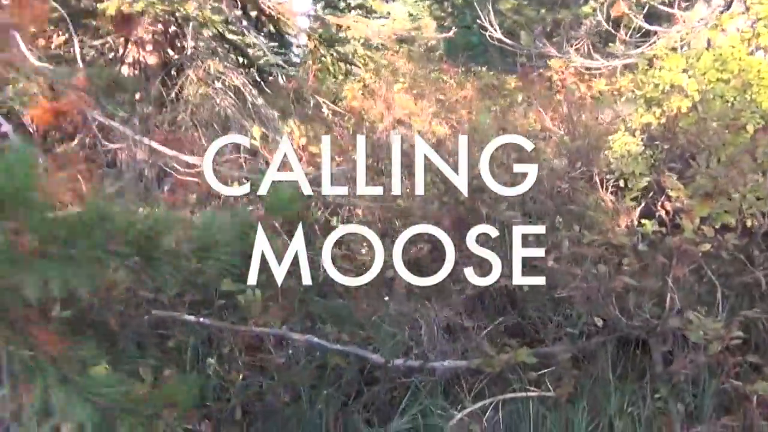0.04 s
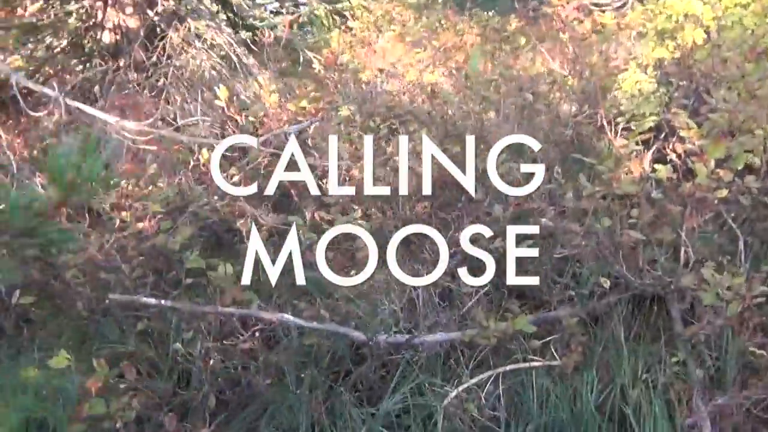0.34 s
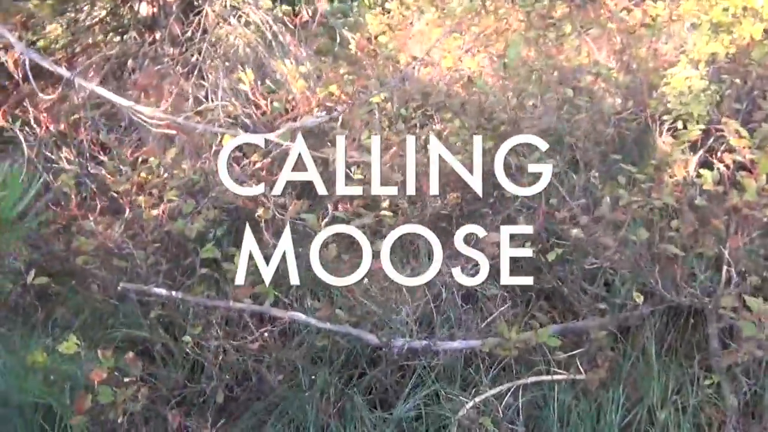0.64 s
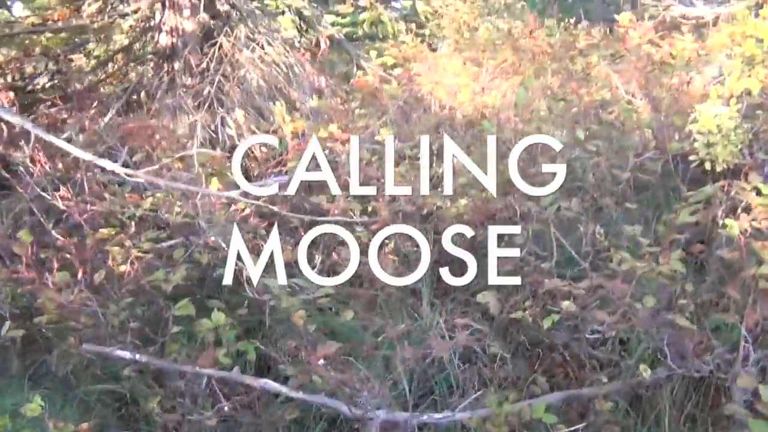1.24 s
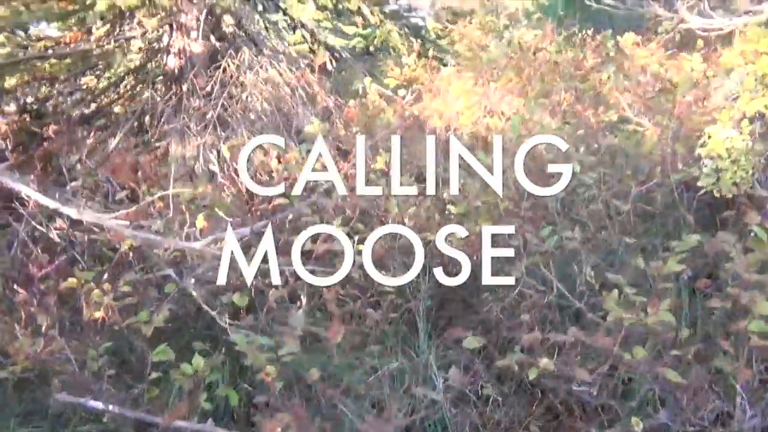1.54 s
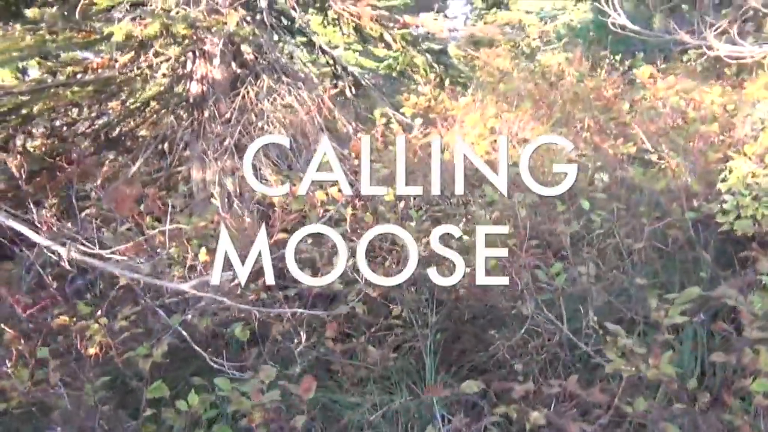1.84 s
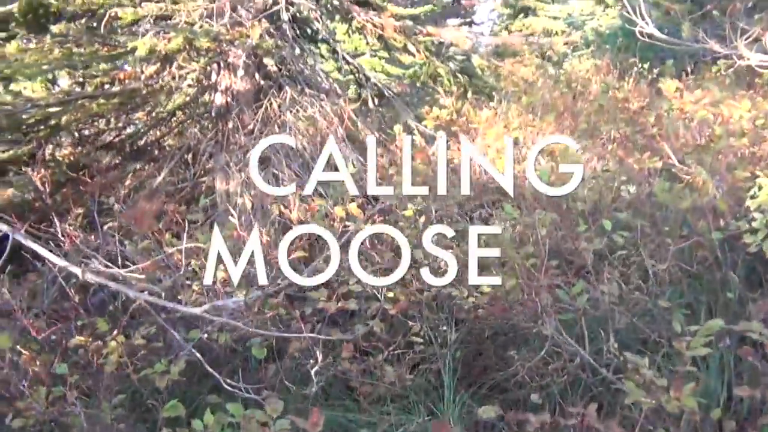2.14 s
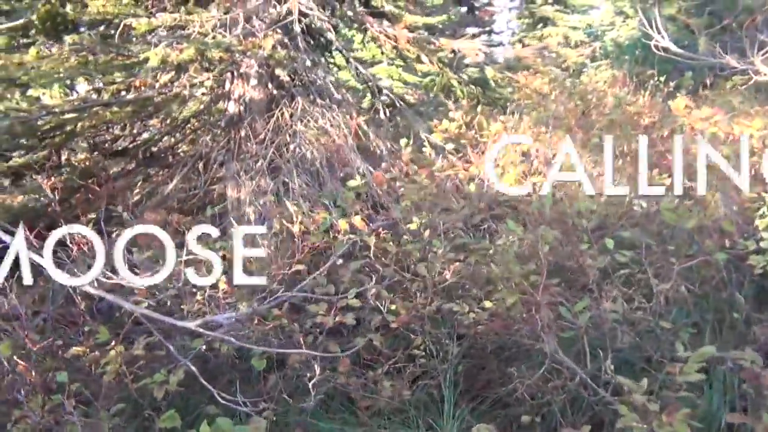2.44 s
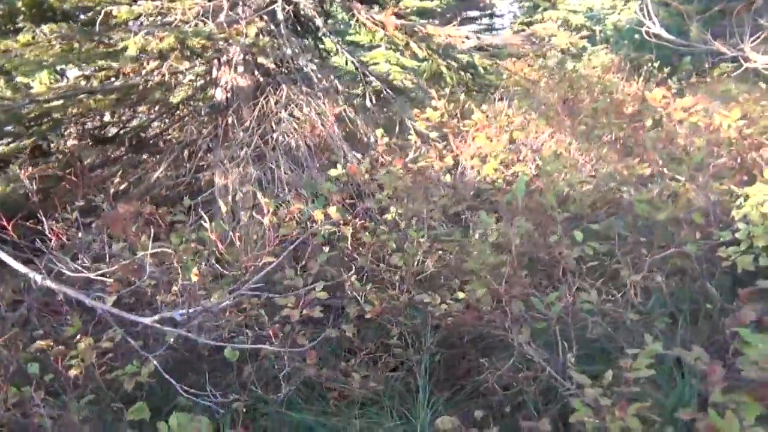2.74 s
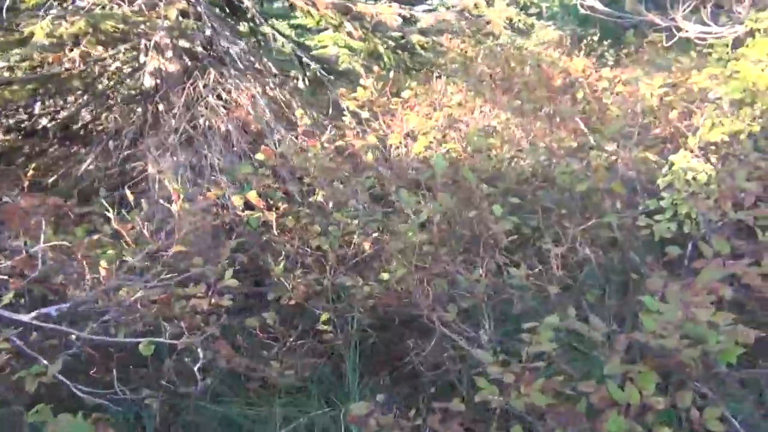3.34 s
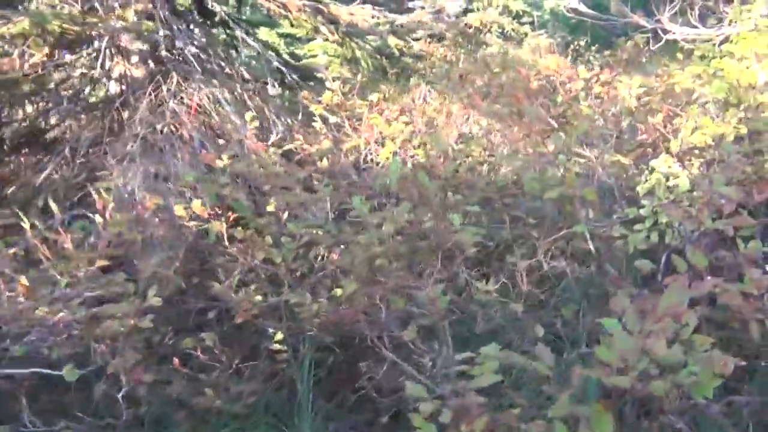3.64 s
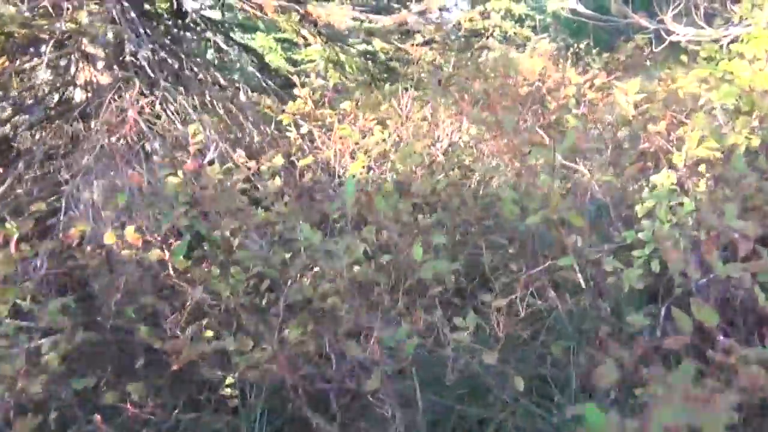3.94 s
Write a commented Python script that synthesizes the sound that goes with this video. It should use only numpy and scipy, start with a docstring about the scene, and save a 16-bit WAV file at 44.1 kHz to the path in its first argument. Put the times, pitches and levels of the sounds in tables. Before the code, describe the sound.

Close rustling of brush and clothing, with microphone handling bumps and a twig snap.

```python
"""A hand-held camera is carried through brush at a forest edge, over faint air and leaf hiss.
Clothing and leaves swish by at once; the grip rubs, scrapes and thumps, with a hard knock at 0.46 s.
A branch sweeps past at 1.1 s. After 1.5 s it is quieter, until a twig snap and a knock at 2.75 s.
A second branch passes at 3.7 s amid ticking twigs. Rubs and knocks travel through the case and
reach the two capsules in opposite polarity, louder on the right."""
import sys
import numpy as np
from scipy import signal
from scipy.fft import rfft, irfft, next_fast_len
from scipy.io import wavfile
from scipy.ndimage import map_coordinates

SR = 44100
rng = np.random.default_rng(int(sys.argv[2]) if len(sys.argv) > 2 else 0)


def unload_wav(signal):
    """Save mono or channel-first audio to the path in sys.argv[1] as 16-bit WAV at rate SR, clipped to [-1, 1]."""
    wavfile.write(
        sys.argv[1],
        SR,
        np.round(np.clip(np.atleast_2d(signal).T, -1, 1) * 32767).astype(np.int16),
    )


N = 176400
T = np.arange(N) / SR

# direction of leaves and twigs: f/Hz, left minus right/dB
FOLIAGE_PAN = [(3000, -17), (8000, 3.5), (12000, -23)]


def amp(db):
    """Decibels to gain."""
    return 10 ** (np.asarray(db) / 20)


def unit(x):
    """Scale to rms 1."""
    return x / np.sqrt(np.mean(x ** 2) + 1e-20)


def along(points, hz):
    """Interpolate (f/Hz, value) points on a log axis."""
    f, v = np.transpose(points)
    return np.interp(np.log(hz + 1), np.log(f + 1), v)


def wobble(rate_hz):
    """Smooth random curve, rate_hz knots a second."""
    return map_coordinates(rng.standard_normal(4096), [T * rate_hz], mode="wrap")


def filtered(x, response):
    """Apply a frequency response."""
    m = next_fast_len(N + SR // 2)
    return irfft(rfft(x, m) * response(np.fft.rfftfreq(m, 1 / SR)), m)[..., :N]


def panned(x, pan):
    """Split the power by pan: f/Hz, left minus right/dB."""
    def gains(hz):
        ratio = amp(along(pan, hz))
        return np.array([ratio, np.ones_like(hz)]) * np.sqrt(2 / (1 + ratio ** 2))
    return filtered(x, gains)


def burst(at_s, rise_s, hold_s, t60_s):
    """Envelope: linear rise, hold, exponential fall."""
    return np.clip((T - at_s) / rise_s, 0, 1) * amp(-60 * np.maximum(T - at_s - rise_s - hold_s, 0) / t60_s)


def pass_gain(db, at_s, hold_s, swell_s, t60_s):
    """Something slides past: swell by 60 dB up to at_s, hold, fade."""
    return amp(db - 60 * np.maximum((at_s - T) / swell_s, 0) - 60 * np.maximum((T - at_s - hold_s) / t60_s, 0))


def flutter(rate_hz):
    """Uneven contact: the gain wanders by about 1 dB."""
    return amp(1.2 * wobble(rate_hz))


def crinkle(per_s=66, surge_db=4.5, t60_s=0.0085):
    """Single leaves catch and let go: brief surges on a gain of 1."""
    catches = (rng.random(N) < per_s / SR) * rng.random(N)
    return 1 + amp(surge_db) * signal.fftconvolve(catches, amp(-60 * T / t60_s))[:N]


def friction(colour, pan, correlation, grain_db, slips_per_s=830):
    """Stereo noise with tiny slips, rms 1. correlation: f/Hz, value (-1 = opposite polarity)."""
    slips = (rng.random((2, N)) < slips_per_s / SR) * rng.choice([-1, 1], (2, N))
    pair = rng.standard_normal((2, N)) + amp(grain_db) * unit(slips)

    def mid_side_gains(hz):
        angle = np.arccos(np.clip(along(correlation, hz), -1, 1)) / 2
        return amp(along(colour, hz)) * [np.cos(angle), np.sin(angle)]
    mid, side = filtered(pair, mid_side_gains)
    return unit(panned(np.array([mid + side, mid - side]), pan))


def background(air_db=-53.5, hiss_db=-54):
    """Faint air in the trees, thin hiss of stirring leaves."""
    # spectra: f/Hz, level/dB
    air_colour = [(100, -5.5), (250, 0.5), (670, -2.5), (850, 2), (1080, -5), (5000, -12.5), (12000, -14)]
    hiss_colour = [(2000, -26), (9000, -17), (16000, -20)]
    air = friction(air_colour, [(1, -9)], [(200, 0.3), (500, -0.35)], grain_db=-30)
    hiss = friction(hiss_colour, FOLIAGE_PAN, [(1, 0.41)], grain_db=-35)
    return amp(air_db) * air + amp(hiss_db) * flutter(16) * crinkle() * hiss


def twigs():
    """Scuffs and snaps mostly on the right, dry ticks and ringing stems ahead."""
    # leaves and twigs flicking past: t/s, level/dB, hold/s, t60/s
    scuffs = [(0.745, -29.5, 0.014, 0.2), (1.168, -33, 0.0053, 0.051), (1.359, -43.5, 0.055, 0.069),
              (1.52, -40.5, 0.0044, 0.092), (2.753, -33.5, 0.0025, 0.083), (3.784, -42, 0.172, 0.04)]
    # twigs: t/s, level/dB, t60/s
    snaps = [(1.405, -40, 0.014), (1.5185, -29.5, 0.0068), (1.65, -36, 0.02), (1.933, -40, 0.015),
             (2.7527, -19, 0.0028)]
    ticks = [(.3615, -34.5, 0.038), (0.5225, -28, 0.1), (1.843, -37, .01), (3.44, -32, 0.0097),
             (3.7188, -34, 0.0024), (3.799, -21, 0.0051), (3.892, -28.5, .008), (3.951, -33, 0.023)]
    # thin stems: t/s, level/dB, f/Hz
    pings = [(2.061, -44, 6360)]
    # spectra: f/Hz, level/dB
    scuff_colour = [(700, -17), (4500, -5.5), (8000, 0), (12000, 5), (16000, -6)]
    tick_colour = [(600, -22), (4500, -6), (9500, 0), (16000, -3)]
    scuff_gain = sum(amp(db) * burst(s, 0.004, hold, t60) for s, db, hold, t60 in scuffs)
    snap_gain = sum(amp(db) * burst(s, 0.0004, 0, t60) for s, db, t60 in snaps)
    tick_gain = sum(amp(db) * burst(s, 0.0004, 0, t60) for s, db, t60 in ticks)
    stems = sum(amp(db) * burst(s, 0.0032, 0, 0.11) * np.sin(2 * np.pi * hz * T + 2 * wobble(990))
                for s, db, hz in pings)
    right = friction(scuff_colour, FOLIAGE_PAN, [(3000, -0.3), (8000, 0.3)], grain_db=-9)
    ahead = friction(tick_colour, [(1, -2)], [(1, 0)], grain_db=-9)
    return (scuff_gain * flutter(140) + snap_gain) * right + tick_gain * ahead + stems


def thumps(rub_gain, sway_hz=58.4, rough_db=-5.5, rumble_db=-4, floor_db=-57):
    """Steps and grip jolt the whole camera, over a low rumble that follows the rubbing."""
    # jolts: t/s, level/dB, f/Hz, t60/s, deep sway re tone/dB
    hits = [(0.362, -23, 200, 0.038, -25), (0.449, -27.5, 178, 0.24, -10), (0.502, -33, 130.5, 0.27, -20),
            (.915, -35.5, 168, 0.29, -27), (.964, -24.5, 195.2, 0.31, -31), (1.18, -29.5, 121.4, 0.15, -2),
            (1.451, -28.5, 115.6, 0.2, -0.5), (1.515, -42.5, 99, 0.38, 7), (2.757, -40, 120.6, 0.3, 7),
            (2.973, -45.5, 127, 0.18, 10), (3.707, -33.5, 114, 0.1, 4)]
    # body rumble: f/Hz, level/dB
    colour = [(25, -1), (58, 4), (125, -2.5), (200, 0.5), (280, -14.5), (700, -44.5)]
    # f/Hz, left minus right/dB
    pan = [(60, -1), (120, -3), (220, -4.5)]
    rough = unit(filtered(rng.standard_normal(N), lambda hz: amp(along(colour, hz))))
    jolts = np.zeros(N)
    for s, db, hz, t60, sway_db in hits:
        phase = 2 * np.pi * hz * (T - s) + 0.89 * wobble(60)
        body = np.sin(phase) + amp(sway_db) * np.sin(sway_hz / hz * phase) + amp(rough_db) * rough
        jolts += amp(db) * burst(s, 0.017 * t60, 0, t60) * body
    rumble = friction(colour, pan, [(200, 0.95), (320, 0.1)], grain_db=-12.5)
    rumble_gain = np.hypot(amp(rumble_db) * rub_gain, amp(floor_db)) * flutter(14)
    return panned(jolts, pan) + rumble_gain * rumble


def grip(rub_gain):
    """The case is rubbed; now and then a finger slips in a short scrape."""
    # finger slips: t/s, level/dB, t60/s
    scrapes = [(0.29, -29.5, 0.018), (0.361, -31.5, 0.061), (0.425, -34.5, 0.12), (0.448, -34.5, 0.39),
               (0.863, -35.5, 0.2), (0.913, -26, 0.083), (0.979, -31.5, 0.084), (1.105, -32.5, 0.082),
               (1.168, -31, 0.076), (3.374, -39.5, 0.11), (3.7, -42.5, 0.26), (3.861, -38, 0.14)]
    # rubbed case: f/Hz, level/dB
    colour = [(120, -16), (260, 4), (470, 1.5), (565, 2.5), (660, 0.5), (800, 0), (1020, -4.5), (1750, -3),
              (4500, -14.5), (14000, -27)]
    # f/Hz, left minus right/dB
    pan = [(250, -12), (700, -7.5), (1800, -6.5), (5000, -17)]
    scrape_gain = sum(amp(db) * burst(s, 0.073 * t60, 0, t60) for s, db, t60 in scrapes)
    gain = np.hypot(rub_gain * flutter(57) * flutter(120), scrape_gain)
    return gain * friction(colour, pan, [(200, -0.54), (400, -0.86), (5000, -1.03)], grain_db=-0.5)


def knocks(left_db=-8.5):
    """Taps ring the case and push the capsules opposite ways; a softer contact is duller."""
    # contacts: t/s, level/dB, low-pass f/Hz
    taps = [(0.4628, -11.5, 1650), (0.4656, -28, 396), (0.5051, -19, 726), (1.265, -24.5, 573),
            (2.221, -33, 1600), (2.7528, -28, 3400)]
    # case resonances: f/Hz, level/dB, t60/s
    modes = [(345, -13.5, 0.09), (625, -4.5, 0.022), (873, 1.5, 0.026), (1210, 3.5, 0.011),
             (1635, 3, 0.011)]
    case = np.zeros(N)
    for s, db, top_hz in taps:
        age_s = np.maximum(T - s, 0)
        ring = sum(amp(level - 60 * age_s / t60) * np.sin(2 * np.pi * hz * age_s)
                   for hz, level, t60 in modes)
        case += amp(db) * signal.sosfilt(signal.butter(2, top_hz, fs=SR, output="sos"), ring)
    return case * np.array([[-amp(left_db)], [1]])


def strokes():
    """Clothing and leaves stroke the camera: gains of hiss and of case rub, summed in power."""
    # t/s, hold/s, hiss/dB, rub/dB, swell/s, t60/s
    passes = [(0, 0.0022, -29.5, -36.5, 0.3, 0.72), (0.286, 0.32, -45, -45, 0.65, 1),
              (0.754, 0.056, -62, -44, 0.45, 0.39), (0.911, 0.12, -35, -38.5, 0.39, 0.73),
              (1.344, 0.26, -47, -50.5, 2.7, 0.64), (1.862, 0.15, -48.5, -55.5, 0.46, 1),
              (3.097, 0.074, -44.5, -49, 1.7, 0.57), (3.394, 0.077, -44.5, -48.5, 0.7, 0.8),
              (3.786, 0.063, -45, -45.5, 0.97, 1)]
    return np.sqrt(sum(pass_gain(np.array([[hiss], [rub]]), s, hold, swell, t60) ** 2
                       for s, hold, hiss, rub, swell, t60 in passes))


def swish(stroke_gain):
    """Fabric slides past, branches sweep over both capsules: each a fluttering, crinkling hiss."""
    # leafy branches: t/s, hold/s, level/dB, swell/s, t60/s
    sweeps = [(1.093, 0.057, -32, 0.28, 0.3), (3.71, 0.023, -30, 0.61, 0.13)]
    # sliding hiss: f/Hz, level/dB
    colour = [(800, -4.5), (2500, -2.5), (6000, 0), (9500, 2), (12500, 0.5), (16000, -7)]
    # f/Hz, left minus right/dB
    stroke_pan = [(3000, -7.5), (8000, 3), (10500, 0.5), (13000, -17.5)]
    sweep_pan = [(1, 0)]
    correlation = [(4000, -0.7), (7000, -0.35), (11000, 0.6)]
    sweep_gain = sum(pass_gain(db, s, hold, swell, t60) for s, hold, db, swell, t60 in sweeps)
    return sum(gain * flutter(45) * crinkle() * friction(colour, pan, correlation, grain_db=-7)
               for gain, pan in ((stroke_gain, stroke_pan), (sweep_gain, sweep_pan)))


def scene():
    """All close and dry; the same strokes drive rumble, rub and swish."""
    hiss_gain, rub_gain = strokes()
    return background() + twigs() + thumps(rub_gain) + grip(rub_gain) + knocks() + swish(hiss_gain)


def record(dry):
    """The camera's bass cut and band limit."""
    low_cut_hz, top_hz = 89, 16100
    cut = signal.sosfilt(signal.butter(2, low_cut_hz, "high", fs=SR, output="sos"), dry)
    return filtered(cut, lambda hz: hz < top_hz)


dry = scene()
out = record(dry)
unload_wav(out)
```